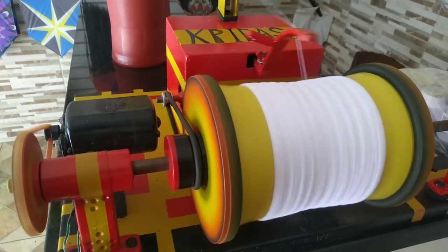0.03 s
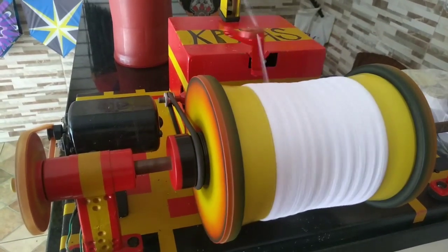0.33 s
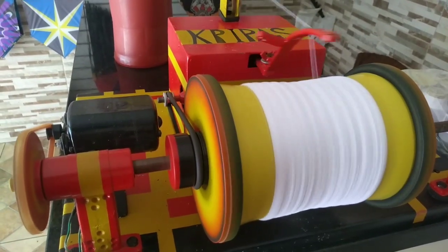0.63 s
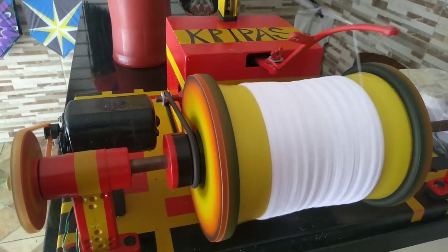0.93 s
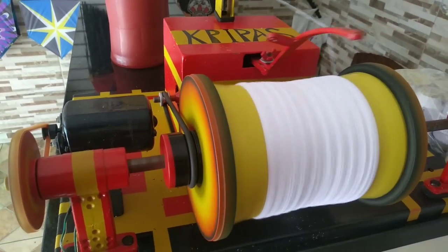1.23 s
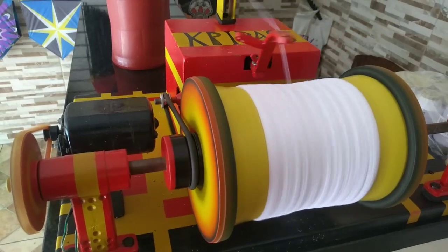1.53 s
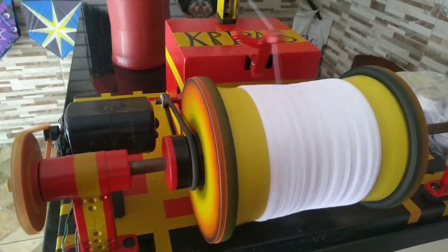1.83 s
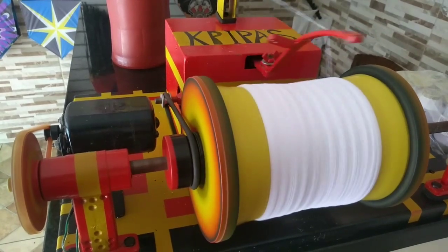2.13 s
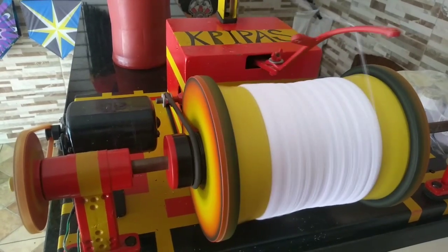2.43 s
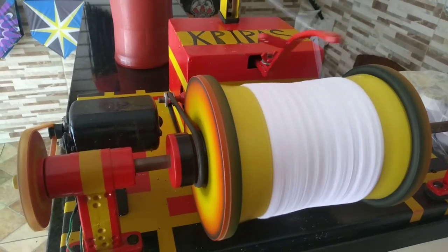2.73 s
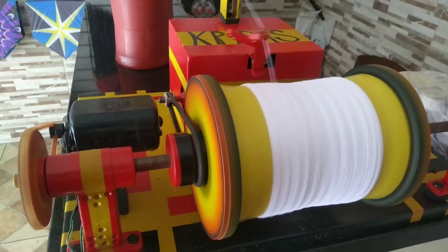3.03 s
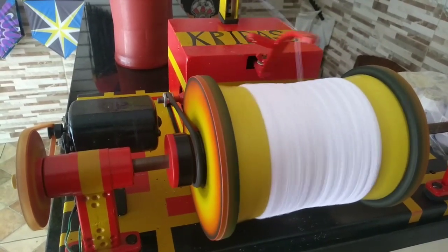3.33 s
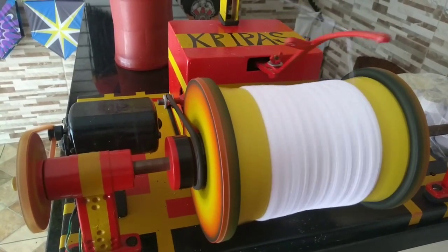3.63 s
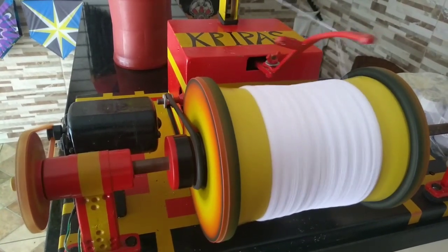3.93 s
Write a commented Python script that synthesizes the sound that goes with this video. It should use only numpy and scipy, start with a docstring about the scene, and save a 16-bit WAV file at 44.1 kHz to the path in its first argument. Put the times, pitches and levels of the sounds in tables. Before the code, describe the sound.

Steady motor whir of a spool winder, with hissing thread and occasional light rattles.

```python
"""A small belt-driven winder spins a large spool indoors, close to a pair of microphones.
From the start the motor whirs on multiples of its shaft speed, belt and bearings rumble through the
frame, the spool throbs as it turns, and the line hisses through its guide with a thin, fluttering squeal.
At about 0.4 s the spool gives the first of its short rattles; from 1.1 s the traverse adds a few knocks.
From 2 s the spool booms louder, and the machine runs on to the end, rattling hardest just before it."""
import sys
import numpy as np
from scipy import signal
from scipy.fft import rfft, irfft
from scipy.io import wavfile
from scipy.ndimage import uniform_filter1d

SR = 44100
rng = np.random.default_rng(int(sys.argv[2]) if len(sys.argv) > 2 else 0)


def int16_out(signal):
    """Quantize to a 16-bit WAV file."""
    q = np.round(np.clip(np.atleast_2d(signal).T, -1, 1) * 32767)
    wavfile.write(sys.argv[1], SR, q.astype(np.int16))


N = 176400
T, HZ = np.arange(N) / SR, np.fft.rfftfreq(N, 1 / SR)

# Motor shaft. Each row: time in seconds, turns per second.
SHAFT_SPEED = [(0, 62.7), (.45, 63), (.9, 62.5), (1.5, 62.6), (2.0, 62.5), (2.25, 63), (2.6, 64.2),
               (2.75, 62), (3.0, 63.1), (3.15, 62.2), (3.5, 62), (3.85, 62.6), (4, 63.3)]
# Tones of the whir. Each row: shaft multiple, level in dB, left minus right in dB,
# left phase lead in radians, pitch wander in Hz.
WHIR_TONES = [(3, -42, -2, 1.66, 2), (6, -51.5, 4, -0.2, 2.5), (7, -39, -4, 0.65, 1.1),
              (8, -42, -7.5, -0.63, 1.3), (9, -38.5, -16, 1, .7), (11, -45, -10, .9, 2),
              (12, -49.5, -3, -0.75, 2.5), (14, -46, -2.5, 0.17, 2.5), (19, -61.5, 1, -0.52, 2),
              (24, -49.5, -9, -1.3, 1)]
# Swells of the three strongest tones, and of the hum. Each row: time in seconds, relative level in dB.
SEVENTH_SWELL = [(0, -39), (.5, -39.5), (1.2, -37.5), (1.5, -40), (1.9, -38.5), (2.1, -33), (2.22, -42),
                 (2.5, -38.5), (2.75, -43), (3, -39.5), (3.5, -38.5), (4, -42.5)]
EIGHTH_SWELL = [(0, -39.5), (.3, -39), (.55, -46), (1.05, -43.5), (1.5, -44), (2.05, -41), (2.8, -43.5),
                (3.4, -46), (3.7, -39), (4, -44)]
NINTH_SWELL = [(0, -47), (.5, -46.5), (.96, -39.5), (1.5, -44.5), (1.85, -49), (2, -41.5), (2.55, -39.5),
               (3.2, -41), (3.6, -41.5), (4, -44)]
HUM_SWELL = [(0.0, -57), (0.03, -49), (1.26, -55.5), (1.37, -55), (2.07, -79), (2.94, -45.5), (3.65, -44),
             (4.0, -64)]
# Swells of the belt and bearings, and of the line. Each row: time in seconds, relative level in dB.
RUMBLE_SWELL = [(0, -30.7), (.12, -30), (.24, -31.5), (.32, -33.5), (.4, -30.5), (.49, -35.2), (.68, -33),
                (.8, -30.6), (1.12, -30.2), (1.25, -32.5), (1.48, -34.4), (1.7, -32), (1.88, -33.5),
                (2.12, -30.5), (2.38, -31.8), (2.55, -29.5), (2.65, -34), (2.74, -34.5), (2.82, -31.5),
                (2.92, -31.5), (3.08, -33), (3.2, -29.8), (3.35, -32), (3.48, -30.4), (3.75, -31.6),
                (3.9, -31), (4, -32)]
LINE_SWELL = [(0.0, -41), (0.08, -44), (.23, -42), (.33, -44), (0.43, -42.5), (0.46, -47), (.63, -46.5),
              (0.87, -43), (1.15, -43), (1.64, -45), (1.75, -41), (1.78, -44.5), (2.58, -42), (2.66, -50),
              (2.68, -44), (2.72, -48), (2.81, -42), (2.86, -44.5), (2.93, -41.5), (3.01, -40), (3.13, -47),
              (3.21, -40.5), (3.24, -46), (3.52, -41), (3.55, -47), (3.62, -42), (4.0, -46.5)]
# EQ of the rumble and of the hiss. Each row: frequency in Hz, relative level in dB.
RUMBLE_EQ = [(20, -83), (35, -79), (50, -64), (78, -62), (98, -65.5), (125, -53.5), (200, -57.5),
             (280, -54.5), (400, -57.5), (550, -56), (720, -59), (900, -64.5), (1050, -66.5), (1300, -74.5),
             (1700, -74.5), (2200, -73.5), (4000, -82.5), (9000, -110)]
HISS_EQ = [(20, -110), (1200, -81.5), (2200, -80.5), (3000, -74), (4000, -79.5), (4400, -80), (5200, -76),
           (6500, -76.5), (7800, -77.5), (10000, -79), (12300, -76.5), (14200, -82.5)]
# Resonances of frame and spool. Each row: frequency in Hz, nominal width in Hz, lift in dB.
FRAME_MODES = [(308, 9.1, 2), (648.4, 6.8, 8.5), (840, 110, -1.5), (992, 35, 3.5), (1407, 20, 12),
               (1503, 36, 11), (1613, 69, 8.5), (1780, 75, 10), (2576, 134, 4.5), (2990, 26, 7),
               (3115, 39, 6), (3220, 60, 6.5), (3450, 70, 6), (3680, 130, 7), (4060, 41, 7.5),
               (4220, 88, 11), (4526, 120, 9), (4947, 105, 7.5), (5260, 70, 6), (5801, 89, 7),
               (6360, 76, 3), (6840, 300, 2)]
# The spool's boom, before its throb. Each row: time in seconds, level in dB.
BOOM_LEVEL = [(0, -44), (.16, -36.5), (.3, -44.5), (.62, -45), (.88, -41), (1.05, -36), (1.3, -38),
              (1.42, -43), (1.56, -39), (1.87, -43), (2.02, -34), (2.2, -33.5), (2.31, -34), (2.4, -38),
              (2.48, -33.5), (2.6, -31.5), (2.68, -36), (2.78, -34.5), (3.12, -38), (3.3, -35.5),
              (3.42, -38), (3.6, -36.5), (3.91, -33.5), (4, -39)]
# Swells of the low and high squeals. Each row: time in seconds, relative level in dB.
LOW_SQUEAL = [(0.0, -53), (0.06, -60.5), (.22, -56), (.5, -62), (1.62, -62), (1.74, -55.5), (1.85, -61),
              (2.05, -60), (2.12, -53), (2.17, -59), (2.58, -55), (2.65, -64), (2.69, -55), (2.9, -57),
              (3.0, -53), (3.11, -60), (3.5, -54), (3.56, -62), (3.76, -53.5), (3.82, -63), (4.0, -60)]
HIGH_SQUEAL = [(0.0, -49), (0.17, -53), (0.51, -53.5), (0.53, -57), (0.89, -49.5), (0.91, -55), (1.15, -52),
               (1.65, -58), (1.75, -48.5), (1.79, -55), (2.58, -53.5), (2.74, -65), (2.8, -50), (2.85, -59),
               (3.01, -46.5), (3.15, -60), (3.21, -47), (3.25, -59), (3.38, -50), (3.53, -52),
               (3.54, -56.5), (4.0, -56)]
# Squeals in the guide. Each row: swell, pitch in Hz, nominal width in Hz, base level in dB, flutter in dB.
GUIDE_SQUEALS = [(LOW_SQUEAL, 9410, 200, -56.5, 3.4), (HIGH_SQUEAL, 11851, 36, -49.5, 3),
                 (HIGH_SQUEAL, 11930, 240, -51, 2.7)]
# Rattles of the spool. Each row: midpoint in seconds, length in seconds, relative level in dB.
RATTLES = [(.385, .06, -34), (.81, .09, -36.5), (.97, .12, -35.5), (1.11, .06, -32.5), (2.255, .05, -34.5),
           (2.52, .07, -37), (3.21, .05, -34), (3.46, .08, -36), (3.67, .06, -35.5), (3.745, .03, -35),
           (3.885, .08, -29.5)]
# The ring of a rattle. Each row: frequency in Hz, nominal width in Hz, relative level in dB.
RATTLE_MODES = [(646, 63, 0.5), (742, 84, 0), (880, 65, -6.5)]
# Knocks of the traverse. Each row: start in seconds, level in dB, centre in Hz, decay in seconds.
KNOCKS = [(1.111, -26.5, 550, .005), (1.300, -29, 600, .004), (2.497, -21.5, 510, .008),
          (2.600, -26, 420, .01), (2.682, -31, 11500, .005), (2.911, -27, 340, .012),
          (3.185, -27, 380, .018)]
# Stereo balance. Each row: frequency in Hz, left minus right in dB.
MIC_BALANCE = [(50, 1.5), (130, -4), (220, -2), (330, -5.5), (480, -6.5), (700, -3.5), (900, -1),
               (1500, -1.5), (1850, -0.5), (2020, 0), (2180, 0), (2600, -2), (3600, -1), (3880, -2),
               (4150, -0.5), (7000, -3), (9000, -4), (11000, -6), (13000, -11.5), (14200, -10)]
# Stereo focus. Each row: frequency in Hz, likeness of left and right from 0 to 1.
MIC_LIKENESS = [(20, .43), (60, 1), (300, 0.78), (600, 0.68), (950, 0.96), (1350, 0.75), (1700, 0.69),
                (1950, 1), (2220, 1), (2500, 0.3), (3100, 1), (3550, 0.54), (3950, 1), (4200, 0.96),
                (4550, 0.8), (5050, 1), (5500, 0.8), (6100, 0.77), (6600, 0.53), (7200, 1), (8000, 0.49),
                (9400, 0.27), (10500, 0.32), (11900, 0.56), (12500, .35), (14000, .15)]
# Stereo phase. Each row: frequency in Hz, extra left lead in radians.
MIC_LEAD = [(50, -0.35), (130, -0.99), (260, -2), (500, -1.54), (650, -1.13), (900, -0.12), (1500, 0),
            (2020, -0.27), (2180, 0.2), (2600, -0.7), (3300, 0.45), (3880, -0.87), (4130, 0.23),
            (4380, 1.1), (4600, -0.13), (12000, -0.39)]


def amp(db):
    """Decibels to gain."""
    return 10 ** (np.asarray(db) / 20)


def unit(x):
    """Scales to rms 1."""
    return x / np.sqrt(np.mean(x ** 2) + 1e-20)


def curve(points):
    """An envelope of straight lines over time."""
    return np.interp(T, *np.transpose(points))


def swing(points):
    """An envelope's rise and fall around its average."""
    level = curve(points)
    return level - level.mean()


def colour(points):
    """A curve over frequency, joined on a log axis."""
    hz, value = np.transpose(points)
    return np.interp(np.log(HZ + 1), np.log(hz + 1), value)


def drift(rate_hz):
    """A random wobble of rms 1, up to about this rate."""
    return unit(irfft(rfft(rng.standard_normal(N)) * (HZ > 0) / (1 + (HZ / rate_hz) ** 4), N))


def peak(hz, width_hz):
    """The bell curve of one resonance, this wide at half height."""
    return 1 / (1 + (2 * (HZ - hz) / width_hz) ** 2)


def frame_gain():
    """The frame's resonances colour whatever sounds through it."""
    lift = sum((amp(db) ** 2 - 1) * peak(hz, 1.4 * width) ** 2 for hz, width, db in FRAME_MODES)
    return np.sqrt(1 + lift.clip(-.9))


def reflections(per_s=1500, decay_s=.035):
    """Early echoes off bench and walls lay a fine, steady ripple on the midrange."""
    taps = (rng.random(N) < per_s / SR) * rng.standard_normal(N)
    taps *= np.exp(-np.minimum(T / decay_s, 50))
    midrange = HZ / (HZ + 900) / (1 + (HZ / 6500) ** 4)
    return 1 + amp(-6) * rfft(taps / np.linalg.norm(taps)) * midrange


def patchy_noise(depth_db, size=512):
    """Two noises that share drifting patches of level in time and frequency."""
    spectra = signal.stft(rng.standard_normal((2, N)), nperseg=size)[2]
    patches = uniform_filter1d(rng.standard_normal(spectra.shape[1:]), size=6, axis=0)
    patches = unit(uniform_filter1d(patches, size=8, axis=1))
    return signal.istft(spectra * amp(depth_db * patches), nperseg=size)[1][:, :N]


def mic_pair(noises, eq, lag_s=.000487):
    """Colours two noises and spreads them in stereo at rms 1; the left mic is inverted and later."""
    direct, diffuse = rfft(noises) * eq
    likeness = np.clip(colour(MIC_LIKENESS), 0, 1)
    blend = likeness * direct + np.sqrt(1 - likeness ** 2) * diffuse
    phase_shift = -np.exp(1j * (colour(MIC_LEAD) - 2 * np.pi * HZ * lag_s))
    left = amp(colour(MIC_BALANCE)) * phase_shift * blend
    return unit(irfft(np.array([left, direct]), N))


def motor_whir(wow_share=.0018, flutter_db=1.8):
    """The motor sings wavering tones on multiples of its shaft speed."""
    speed = curve(SHAFT_SPEED) * (1 + wow_share * drift(8.24))
    swells = {7: swing(SEVENTH_SWELL), 8: swing(EIGHTH_SWELL), 9: swing(NINTH_SWELL)}
    out = np.zeros((2, N))
    for multiple, db, left_db, lead, wander_hz in WHIR_TONES:
        swell = swells.get(multiple, swing(RUMBLE_SWELL) / 2)
        phase = 2 * np.pi * np.cumsum(multiple * speed + wander_hz * drift(16.3)) / SR
        level = db + 0.85 * swell + flutter_db * drift(13)
        out += amp(level) * np.array([amp(left_db) * np.cos(phase + lead), np.cos(phase)])
    return np.sqrt(2) * out


def motor_hum(hz=57.7, left_lead_rad=2.47):
    """A low hum comes and goes under the whir."""
    phase = 2 * np.pi * np.cumsum(hz + 0.8 * drift(3.3)) / SR
    tone = np.array([.8 * np.cos(phase + left_lead_rad), np.cos(phase)])
    return np.sqrt(2) * amp(curve(HUM_SWELL) + 5) * tone


def belt_rumble(flicker_db=.62):
    """Belt and bearings rumble through the frame."""
    level = curve(RUMBLE_SWELL) + 1 + flicker_db * drift(43)
    noise = patchy_noise(depth_db=1.45)
    return amp(level) * mic_pair(noise, amp(colour(RUMBLE_EQ)) * frame_gain() * reflections())


def spool_boom(hz=194.2, width_hz=34.8, turns_per_s=7.0, throb_db=1.5):
    """The spool booms, swelling once in each turn."""
    speed = curve(SHAFT_SPEED)
    turns = np.cumsum(turns_per_s * speed / speed.mean()) / SR
    level = curve(BOOM_LEVEL) + throb_db * np.cos(2 * np.pi * turns)
    return amp(level) * mic_pair(rng.standard_normal((2, N)), peak(hz, width_hz))


def line_hiss(eq, pull_db, crossover_hz=6600):
    """The line rushes onto the spool and, above the crossover, hisses in the guide as its pull varies."""
    low_share = 1 / (1 + (HZ / crossover_hz) ** 6)
    flicker_db = 1.26 * drift(31)
    rush_db = -38 + 0.3 * swing(RUMBLE_SWELL) + 0.5 * pull_db + .4 * flicker_db
    hiss_db = -42 + 0.94 * pull_db + flicker_db
    rush = amp(rush_db) * mic_pair(patchy_noise(depth_db=2), eq * np.sqrt(low_share))
    hiss = amp(hiss_db) * mic_pair(patchy_noise(depth_db=2), eq * np.sqrt(1 - low_share))
    return rush + hiss


def line_snags(eq, pull_db, per_s=200, spread_db=2.5, decay_s=.00058):
    """Tiny snags of the line make a fine, bright crackle."""
    snags = (rng.random(N) < per_s / SR) * amp(spread_db * np.minimum(rng.exponential(1, N), 4))
    bursts = signal.lfilter([1], [1, -np.exp(-1 / (decay_s * SR))], snags + 1e-12)
    return amp(-49 + 0.94 * pull_db) * mic_pair(bursts * rng.standard_normal((2, N)), eq * HZ)


def guide_squeals():
    """The line slides through the guide, squealing in thin, fluttering bands."""
    out = np.zeros((2, N))
    for swell, hz, width, db, flutter_db in GUIDE_SQUEALS:
        envelope = amp(db + 1.37 * swing(swell)) * unit(amp(flutter_db * drift(30)))
        out += envelope * mic_pair(rng.standard_normal((2, N)), peak(hz, 1.4 * width))
    return out


def spool_rattle(trim_db=-1, flicker_db=1):
    """The spool rattles in short surges, ringing a few broad resonances."""
    power = sum(amp(db) ** 2 * np.exp(-(2 * (T - middle) / length) ** 2) for middle, length, db in RATTLES)
    envelope = np.sqrt(power) * amp(trim_db + flicker_db * drift(60))
    ring = sum(amp(db) * peak(hz, width) for hz, width, db in RATTLE_MODES)
    return envelope * mic_pair(rng.standard_normal((2, N)), ring)


def traverse_knocks(attack_s=.0013, spread_octaves=1.0):
    """The traverse sends dull knocks and one bright tick through the frame."""
    out = np.zeros((2, N))
    for start, db, hz, decay in KNOCKS:
        age = np.maximum(T - start, 0)
        envelope = np.minimum(age / attack_s, 1) * np.exp(-np.minimum(age / decay, 50))
        band = np.exp(-.5 * (np.log2((HZ + 1) / hz) / spread_octaves) ** 2)
        out += amp(db) * envelope * mic_pair(rng.standard_normal((2, N)), band * frame_gain())
    return out


def scene():
    """The mix: the running machine and its line, with rattles and knocks on top."""
    machine = motor_whir() + motor_hum() + belt_rumble() + spool_boom()
    line_eq = amp(colour(HISS_EQ)) * frame_gain() * reflections()
    pull_db = swing(LINE_SWELL)
    line = line_hiss(line_eq, pull_db) + line_snags(line_eq, pull_db) + guide_squeals()
    return machine + line + spool_rattle() + traverse_knocks()


def record(dry):
    """A steep low-pass takes off the air above about 14.3 kHz."""
    low_pass = signal.firwin(1601, 14290, window=("kaiser", 9), fs=SR)
    return signal.oaconvolve(dry, low_pass[None], "same")


dry = scene()
out = record(dry)
int16_out(out)
```